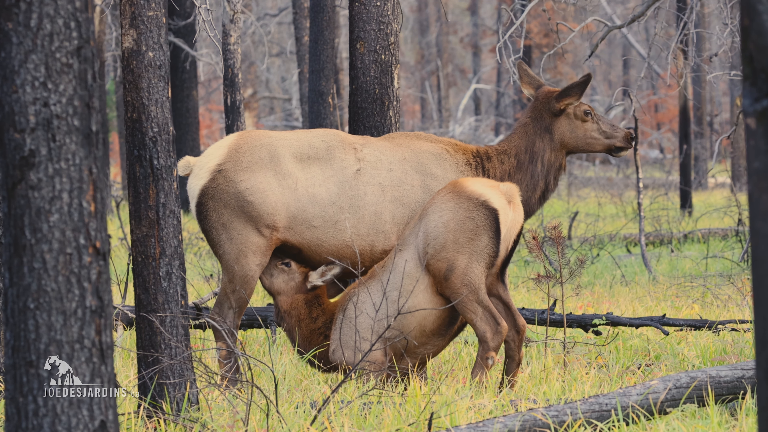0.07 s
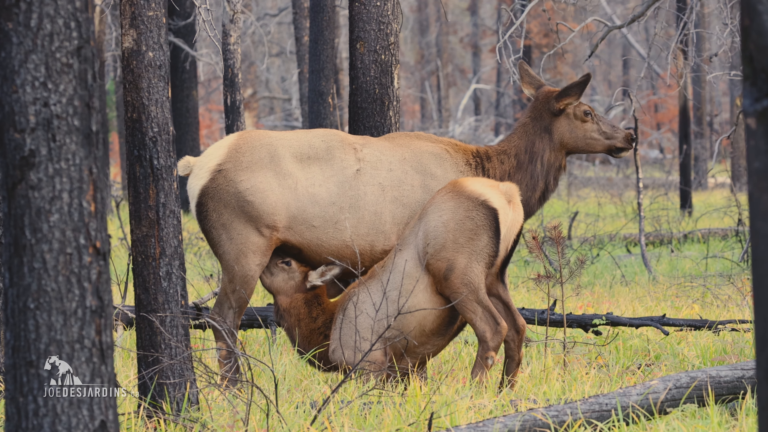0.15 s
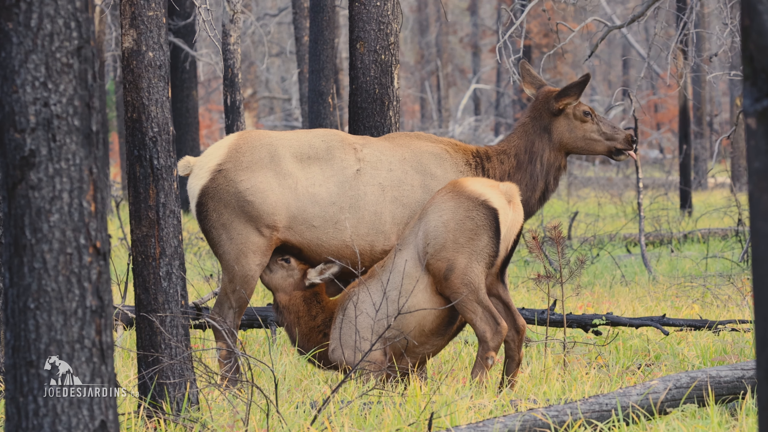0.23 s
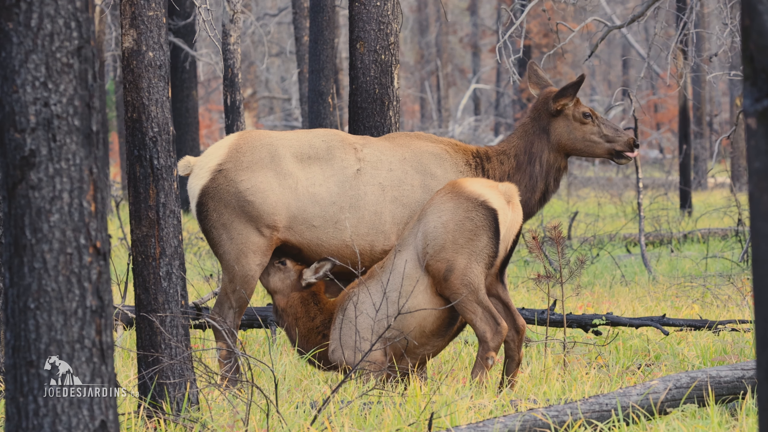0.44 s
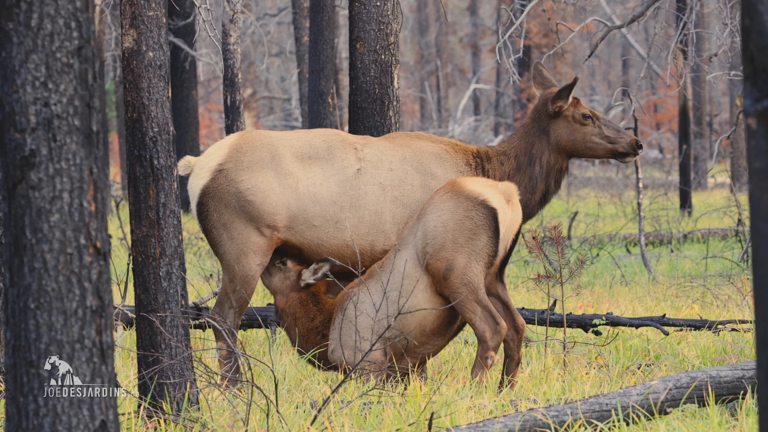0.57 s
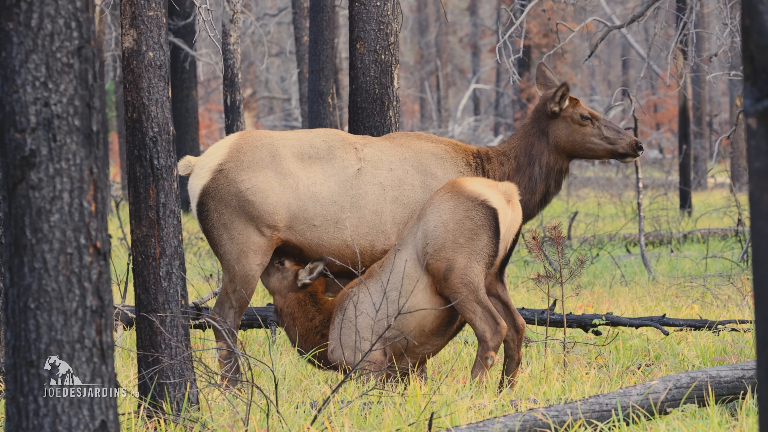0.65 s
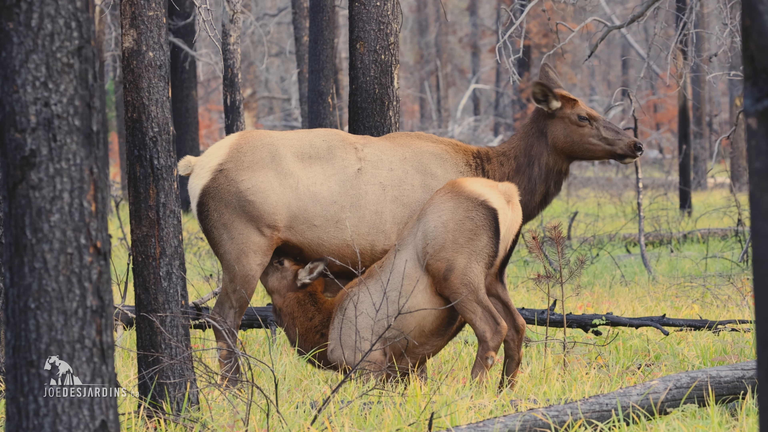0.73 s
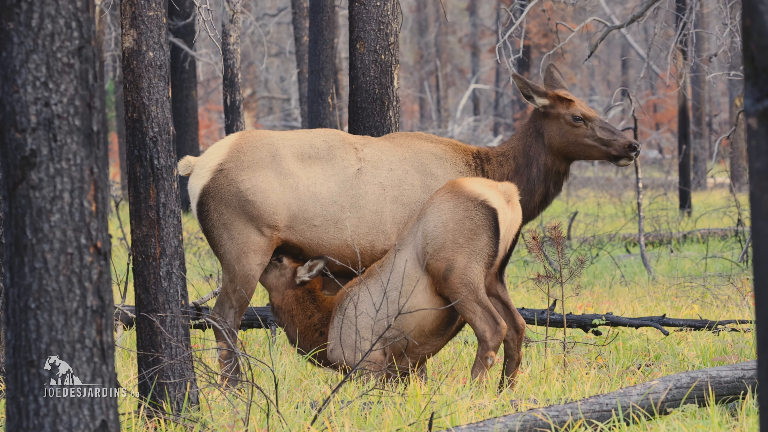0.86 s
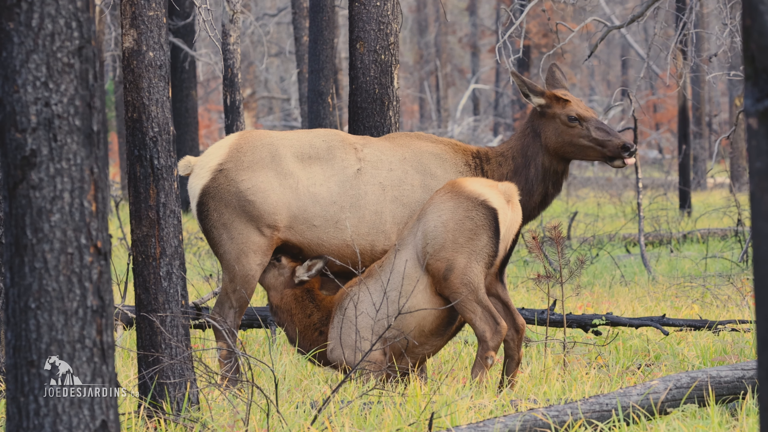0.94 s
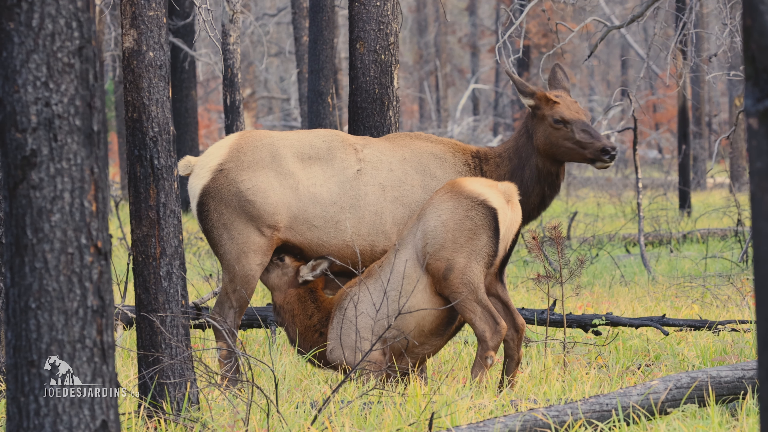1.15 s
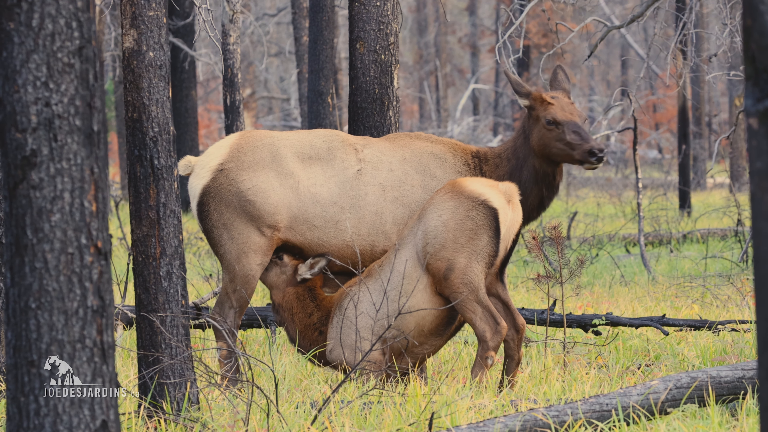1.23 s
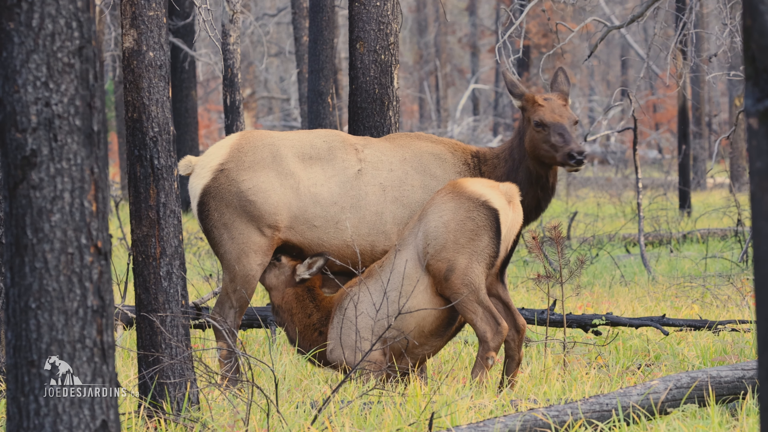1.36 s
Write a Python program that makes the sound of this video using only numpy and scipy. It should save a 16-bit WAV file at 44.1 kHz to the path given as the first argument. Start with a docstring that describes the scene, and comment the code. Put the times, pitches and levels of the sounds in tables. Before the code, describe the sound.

In a forest, an elk gives a high, rising and falling whistle and two brief ones, each ending in a rough grunt and ringing among the trees. Nearby twigs snap and something knocks once over a soft rumble.

```python
"""Elk bugling in a forest

One long whistle arches up and drops, then two short ones follow, with thin squeaks beside them.
Each whistle breaks down into a hoarse grunt: uneven pulses and breath through the open throat.
The calls and a dull knock ring among the trunks; twigs snap close by over a low rumble and faint hum."""
import sys
import numpy as np
from scipy import signal
from scipy.fft import rfft, irfft
from scipy.io import wavfile

SR = 44100
rng = np.random.default_rng(int(sys.argv[2]) if len(sys.argv) > 2 else 0)


def persist_wave(psi):
    """Save psi, clipped to +-1, as 16-bit WAV."""
    counts = np.round(np.clip(psi, -1, 1) * 32767).astype(np.int16)
    wavfile.write(sys.argv[1], SR, np.atleast_2d(counts).T)


N = 61739

EDGE_S, JITTER_SHARE, JITTER_HZ, SHIMMER_DB = 0.0027, 0.0021, 168, 0.5
AIR_DB, AIR_WIDTH_HZ = -29.5, 450  # turbulence around the two lower partials, relative to the octave
# The three whistles. Each row: time in seconds, pitch in Hz, fundamental in dB, octave in dB.
LONG_CALL = [(.015, 2088, -47.5, -64), (.028, 2058, -39.5, -61), (0.054, 1920, -63, -59.5),
             (.11, 1908, -48, -52), (0.143, 1915, -51.5, -58), (.185, 2026, -38.5, -59),
             (0.217, 2051, -35, -45), (0.257, 2144, -36.5, -37.5), (0.283, 2205, -40, -37.5),
             (0.314, 2253, -40, -46), (.345, 2274, -39.5, -36.5), (0.408, 2298, -31.5, -36.5),
             (.465, 2291, -37, -38.5), (0.489, 2267, -27, -42), (.5, 2200, -38, -42),
             (0.506, 2120, -22.5, -38.5), (0.523, 2049, -14, -37), (0.53, 2068, -23, -41.5),
             (0.531, 1756, -27.5, -41), (0.544, 1700, -44, -84.5)]
SECOND_CALL = [(0.753, 1778, -75, -71), (.775, 1872, -49, -40), (.79, 1907, -52, -43), (.8, 1985, -49, -45),
               (.82, 2065, -37.5, -44), (0.841, 2084, -33.5, -41.5), (0.852, 2021, -37, -42),
               (0.867, 1848, -41, -47.5), (0.878, 1670, -55, -69)]
THIRD_CALL = [(1.186, 1818, -48, -77), (1.199, 1846, -44.5, -49), (1.225, 1930, -87, -53.5),
              (1.252, 2025, -70, -56.5), (1.261, 1970, -91, -67), (1.28, 1926, -56, -38.5),
              (1.288, 1730, -36.5, -54), (1.301, 1676, -44.5, -84)]
# Their bite. One entry per whistle: third harmonic in dB relative to the octave.
THIRD_HARMONIC_DB = [-33, -29, -20]


def whistle(t, call, third_db):
    """The elk's whistle: a nearly pure tone with a strong octave, a weak third harmonic and some air."""
    start, end = call[0][0], call[-1][0]
    gate = np.clip(1 + np.minimum(t - start, end - t) / EDGE_S, 0, 1)
    hz = curve(t, call) * (1 + JITTER_SHARE * wander(JITTER_HZ))
    phase = 2 * np.pi * np.cumsum(hz) / SR
    fundamental = undb(curve(t, call, column=2) + SHIMMER_DB * wander(59))
    octave = undb(curve(t, call, column=3) + SHIMMER_DB * wander(77))
    overtones = np.sin(2 * phase) + undb(third_db) * np.sin(3 * phase)
    tone = fundamental * np.sin(phase) + octave * overtones
    air = sum(wander(AIR_WIDTH_HZ) * np.sin(k * phase) + wander(AIR_WIDTH_HZ) * np.cos(k * phase)
              for k in (1, 2))
    return np.sqrt(2) * gate * (tone + octave * undb(AIR_DB) * air)


GRUNT_ATTACK_S, GRUNT_DECAY_S, ROUGHEN_S = 0.0087, 0.039, 0.019
GRUNT_FALL_PER_S, RASP_CUTOFF_HZ = 3.3, 2200
# The throat's resonances. Each row: frequency in Hz, relative gain in dB.
THROAT_COLOUR = [(150, -41.5), (480, -5), (750, -7), (950, 2.5), (1400, -3.5), (1650, -9), (2200, -16),
                 (2800, -15.5), (4000, -25), (5500, -29.5), (7500, -51), (15000, -72)]
# The grunt that ends each whistle. Each row: start in seconds, hold in seconds, level in dB,
# starting pitch in Hz, held tone in Hz, that tone's level in dB relative to the rough voice.
GRUNTS = [(0.529, 0.047, -31, 434, 1259, -0.5), (0.869, 0.024, -33.5, 368.4, 1040, -4.5),
          (1.294, 0.009, -35, 323.9, 952, -7)]


def grunt(t, start, hold, db, pitch_hz, tone_hz, tone_db):
    """Uneven, falling pulses and gated noise pass through the open throat, around one shaky tone."""
    age = np.maximum(t - start, 0)
    fall = np.exp(-GRUNT_FALL_PER_S * np.minimum(age, .15))
    cycles = np.cumsum(pitch_hz * fall * (1 + .035 * wander(150))) / SR
    pulses = np.diff(np.floor(cycles), prepend=0)
    puffs = unit(np.exp(-(cycles % 1) / .5) * rng.standard_normal(N))  # one puff of breath per pulse
    rasp = signal.lfilter(*signal.butter(2, RASP_CUTOFF_HZ, fs=SR), puffs)
    voice = unit(colour(unit(pulses - pulses.mean()) + rasp, THROAT_COLOUR))
    shaky_hz = tone_hz * (1 + .028 * wander(129.6))
    tone = unit(sine(shaky_hz))
    roughen = np.minimum(age / ROUGHEN_S, 1)  # the tone leads, the rough voice grows in
    blend = (roughen * voice + undb(tone_db) * tone) / np.hypot(1, undb(tone_db))
    attack = np.minimum(age / GRUNT_ATTACK_S, 1)
    decay = np.exp(-np.maximum(age - GRUNT_ATTACK_S - hold, 0) / GRUNT_DECAY_S)
    return undb(db) * attack * decay * blend


# Brief side whistles. Each row: start in seconds, length in seconds, opening pitch in Hz,
# closing pitch in Hz, level in dB, waver as a share of the pitch.
SQUEAKS = [(.165, .09, 4920, 5300, -64.5, .005), (0.352, 0.083, 1700, 1737, -43.5, .003),
           (.27, 0.31, 3980, 3955, -53, 0.031), (.34, 0.16, 5100, 5300, -63, 0.0082),
           (0.442, 0.075, 5150, 4750, -57, .008), (0.465, 0.047, 1930, 2106, -35, 0.0085),
           (0.74, 0.064, 4820, 5738, -65.5, .006), (0.796, .05, 4680, 4760, -50.5, 0.0065),
           (.842, 0.0262, 1690, 1777, -38.5, 0.0083), (1.216, 0.038, 4720, 4920, -61, 0.0096),
           (1.257, 0.029, 4380, 4670, -54, 0.016), (1.282, 0.0148, 4900, 4430, -55, 0.022)]


def squeak(t, start, length, from_hz, to_hz, db, waver):
    """A short, thin glide beside the main whistle; the more it wavers, the hoarser it is."""
    along = np.clip((t - start) / length, 0, 1)
    hz = (from_hz + (to_hz - from_hz) * along) * (1 + waver * wander(JITTER_HZ))
    fades = np.minimum(np.minimum(along, 1 - along) / 0.36, 1)  # each fade takes 36% of the length
    return np.sqrt(2) * undb(db + SHIMMER_DB * wander(70)) * fades * sine(hz)


KNOCK_START_S, KNOCK_ATTACK_S, KNOCK_DB = .27, 0.001, -26.5
# The knock's modes. Each row: frequency in Hz, level in dB relative to KNOCK_DB, seconds to fall 60 dB.
KNOCK_MODES = [(247.6, 1.5, 0.06), (207, -20.5, 0.21), (473, -9, .04), (849, -16.5, 0.077),
               (1308, -4.5, 0.078), (1390, -11, 0.15), (1620, -8.5, 0.0325), (5770, -17, 0.018)]


def knock(t):
    """A dull knock, perhaps a hoof on wood: one blow rings a few quickly damped modes."""
    age = np.maximum(t - KNOCK_START_S, 0)
    ring = sum(undb(db) * np.sin(2 * np.pi * hz * age) * np.exp(-np.log(1000) * age / t60)
               for hz, db, t60 in KNOCK_MODES)
    attack = 1 - np.exp(-(age / KNOCK_ATTACK_S) ** 2)
    return undb(KNOCK_DB) * ring * attack


SNAP_DECAY_S, TICK_DECAY_S, TICK_WIDTH_HZ = .0012, .0018, 510
# Dry twig snaps. Each row: start in seconds, level in dB.
SNAPS = [(.0095, -30), (0.0347, -37), (0.046, -35.5)]
# Their brittle colour. Each row: frequency in Hz, relative gain in dB.
SNAP_COLOUR = [(400, -13), (1200, 13.5), (2200, 16.5), (3500, -20), (6000, -25), (7900, -4), (10000, -16),
               (15000, -28)]
# Faint ticks in the grass. Each row: start in seconds, level in dB, centre frequency in Hz.
GRASS_TICKS = [(.433, -53.5, 9000), (.572, -55.5, 8300), (.668, -60, 10560), (.687, -59, 10300),
               (.978, -50, 8760)]


def twigs(t):
    """Twigs snap in tiny bursts of broad noise; grass ticks in high, narrow bands."""
    def burst(start, decay):
        return (t >= start) * np.exp(-np.maximum(t - start, 0) / decay)

    crackle = unit(colour(rng.standard_normal(N), SNAP_COLOUR))
    snaps = crackle * sum(undb(db) * burst(start, SNAP_DECAY_S) for start, db in SNAPS)
    ticks = 0
    for start, db, hz in GRASS_TICKS:
        band = unit(wander(TICK_WIDTH_HZ) * np.sin(2 * np.pi * hz * t))
        ticks += undb(db) * burst(start, TICK_DECAY_S) * band
    return snaps + ticks


TAIL_DB, NEAR_DB, NEAR_DECAY_S, FIRST_ECHO_S = -7, -9.5, 0.048, .012
# The forest's ring. Each row: band centre in Hz, seconds to fall 60 dB.
FOREST_DECAY = [(150, 0.8), (1000, 4.7), (2100, 1.73), (4300, 1), (9000, 0.4)]


def forest(t, sound):
    """Quick scatter from the nearest trunks and a long tail that lasts best in the mids."""
    hz = np.fft.rfftfreq(N, 1 / SR)
    spectrum = rfft(rng.standard_normal(N))
    tail = 0
    for centre, t60 in FOREST_DECAY:
        share = by_pitch(hz, [(f, f == centre) for f, _ in FOREST_DECAY])  # crossfade between bands
        rate = np.log(1000) / t60
        tail += irfft(spectrum * share, N) * np.exp(-rate * t) * np.sqrt(2 * rate / SR)
    near = rng.standard_normal(N) * np.exp(-t / NEAR_DECAY_S) * np.sqrt(2 / (NEAR_DECAY_S * SR))
    response = undb(TAIL_DB) * tail + undb(NEAR_DB) * near
    response = colour(response, [(2300, 0), (4200, -0.5)])  # a touch less treble
    echoes = signal.fftconvolve(sound, response)[:N]
    return np.interp(t - FIRST_ECHO_S, t, echoes, left=0)


FLOOR_DB, FLOOR_FADE_DB_PER_S, FLOOR_SWELL_DB = -45, -1, 1.5
# Colours of the rumble's floor and of its darker body. Each row: frequency in Hz, relative gain in dB.
FLOOR_COLOUR = [(20, -32), (40, -12.5), (58, -1.5), (72, -3.5), (92, 1), (135, -7), (250, -4.5),
                (330, -5.5), (520, 0), (800, -5.5), (1150, -13), (1600, -18), (2100, -9), (2600, -23.5),
                (4000, -26), (6500, -32), (9000, -37), (15500, -49.5)]
BODY_COLOUR = [(30, -11.5), (70, -3.5), (140, -11.5), (280, -4), (550, -8.5), (1000, -13.5), (2500, -49.5)]
# The body holds, then drops away. Each row: time in seconds, level in dB.
BODY_LEVEL = [(0, -47.5), (.3, -46), (.58, -45.5), (.74, -59), (1.4, -57.5)]


def rumble(t):
    """A low background rumble that slowly fades, with a darker body that drops away midway."""
    floor_db = FLOOR_DB + FLOOR_FADE_DB_PER_S * (t - t.mean()) + FLOOR_SWELL_DB * wander(1.3)
    floor = unit(colour(rng.standard_normal(N), FLOOR_COLOUR))
    body = unit(colour(rng.standard_normal(N), BODY_COLOUR))
    return floor * undb(floor_db) + body * undb(curve(t, BODY_LEVEL))


# The hum's partials. Each row: frequency in Hz, opening level in dB, level change in dB per second.
HUM_PARTIALS = [(69.3, -57, 5.5), (80.6, -59, 2.5), (95.4, -56, -0.5), (111.8, -55, -7), (162.8, -48, -10)]


def hum(t):
    """A faint hum, perhaps a far-off idling engine: low tones that drift in pitch together."""
    speed = 1 + 0.0071 * wander(7.7)
    return np.sqrt(2) * sum(undb(db + slope * t + 0.1 * wander(10)) * sine(hz * speed)
                            for hz, db, slope in HUM_PARTIALS)


def undb(db):
    """Decibels to gain."""
    return 10 ** (np.asarray(db) / 20)


def unit(x):
    """Scale to rms 1."""
    return x / np.sqrt(np.mean(x ** 2))


def sine(hz):
    """A sine that follows a moving pitch."""
    return np.sin(2 * np.pi * np.cumsum(hz) / SR)


def curve(t, table, column=1):
    """One column of a table over time, joined by straight lines."""
    rows = np.array(table, float)
    return np.interp(t, rows[:, 0], rows[:, column])


def by_pitch(hz, table):
    """A table read on a log-frequency axis."""
    rows = np.array(table, float)
    return np.interp(np.log(hz + 1), np.log(rows[:, 0]), rows[:, 1])


def colour(x, table):
    """Equalise through (Hz, dB) points."""
    return irfft(rfft(x) * undb(by_pitch(np.fft.rfftfreq(N, 1 / SR), table)), N)


def wander(rate_hz):
    """Smooth random motion with a spread near 1, up to about the given rate."""
    hz = np.fft.rfftfreq(2 * N, 1 / SR)
    spectrum = rfft(rng.standard_normal(2 * N))
    return unit(irfft(spectrum / (1 + (hz / rate_hz) ** 4)))[:N]


def scene():
    """The elk and the knock echo among the trees; twigs, rumble and hum stay dry."""
    t = np.arange(N) / SR
    background = rumble(t) + hum(t)
    calls = zip((LONG_CALL, SECOND_CALL, THIRD_CALL), THIRD_HARMONIC_DB)
    whistles = sum(whistle(t, call, third_db) for call, third_db in calls)
    squeaks = sum(squeak(t, *row) for row in SQUEAKS)
    grunts = sum(grunt(t, *row) for row in GRUNTS)
    direct = whistles + squeaks + grunts + knock(t)
    return (direct + forest(t, direct) + twigs(t) + background)[None]


def record(dry):
    """A steep low-pass trims the top above 15.7 kHz."""
    return signal.sosfilt(signal.ellip(10, .2, 80, 15700, fs=SR, output="sos"), dry)


dry = scene()
out = record(dry)
persist_wave(out)
```